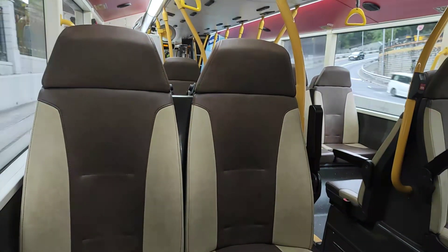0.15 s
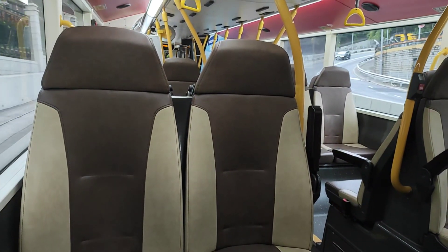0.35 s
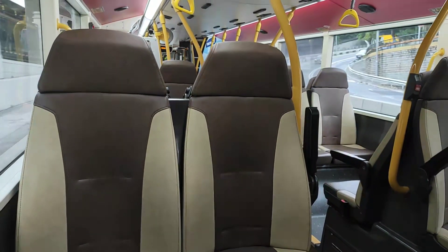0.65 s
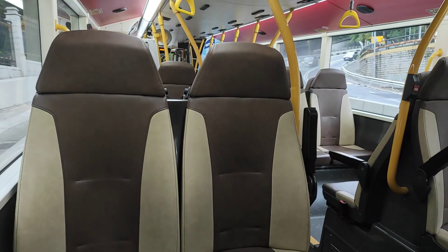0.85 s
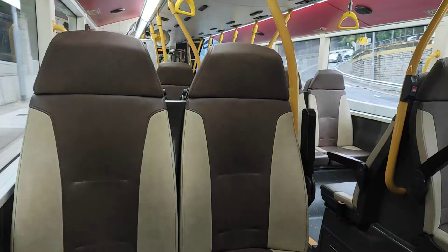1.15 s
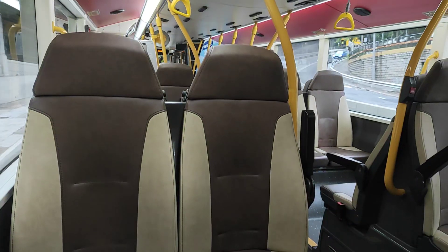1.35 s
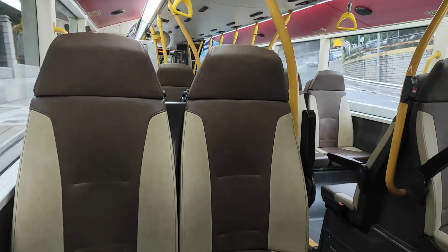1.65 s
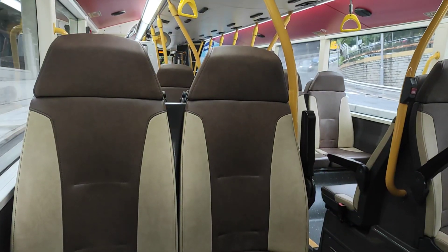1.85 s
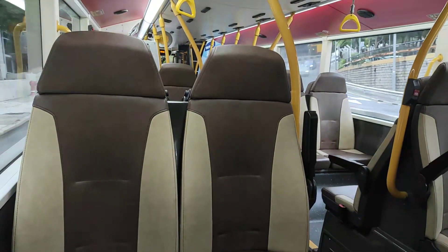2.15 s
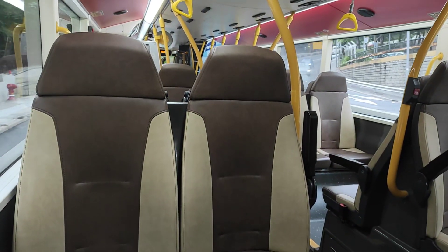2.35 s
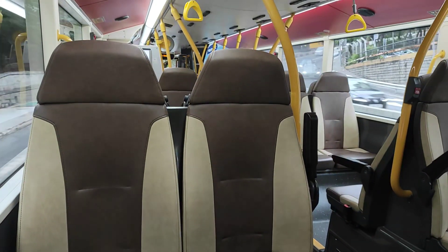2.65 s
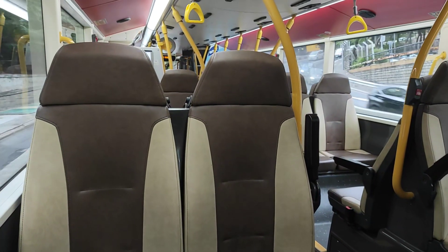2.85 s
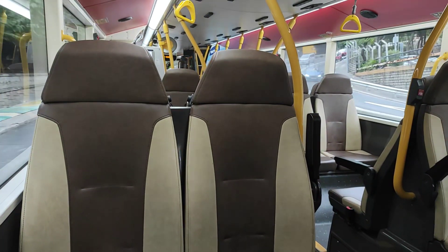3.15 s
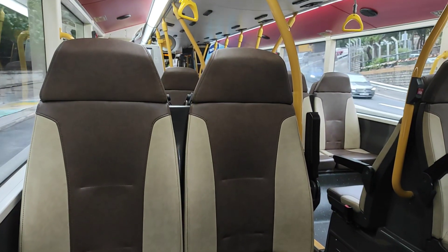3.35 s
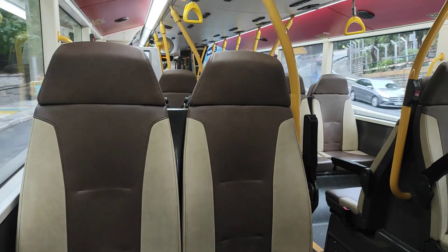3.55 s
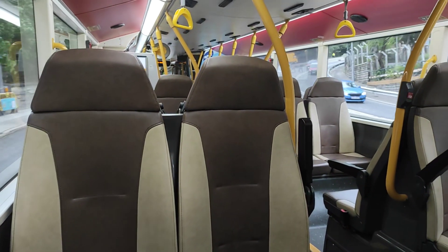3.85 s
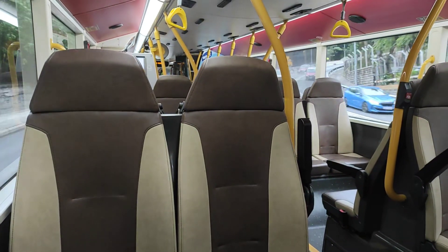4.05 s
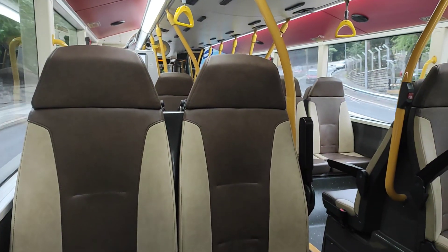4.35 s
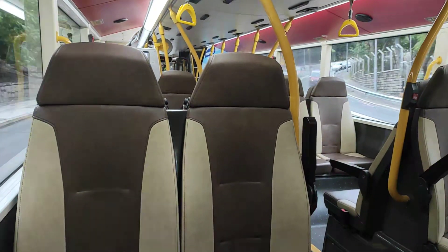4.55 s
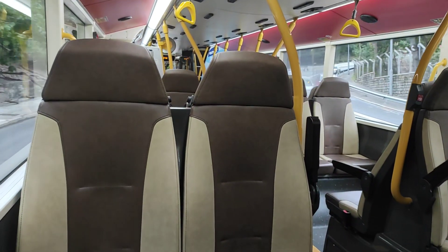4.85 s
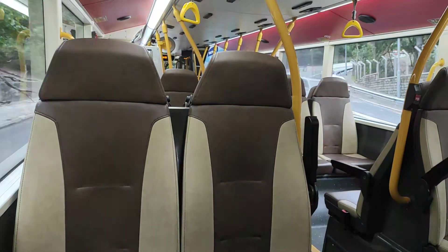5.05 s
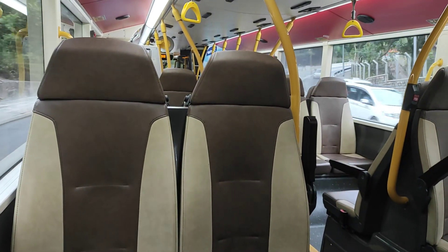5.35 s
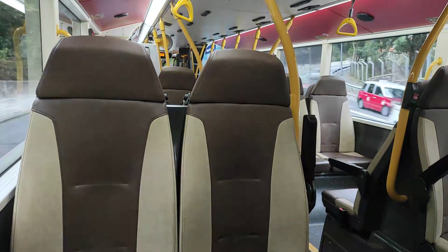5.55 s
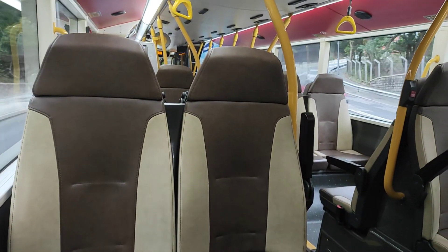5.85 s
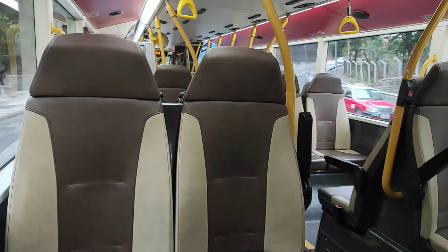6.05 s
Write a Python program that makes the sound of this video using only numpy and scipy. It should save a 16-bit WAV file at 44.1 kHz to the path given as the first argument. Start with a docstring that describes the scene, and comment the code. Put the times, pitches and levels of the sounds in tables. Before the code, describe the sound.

Inside a moving bus, a deep engine hum rises gently and drops at a gear change, over tyre roar, bumps and light rattles.

```python
"""Upper deck of a diesel bus climbing a slope. From the start the six-cylinder engine throbs over the
road's rumble and roar, with a moaning fan, faint gear whine and sizzling trim. Just after 1 s the window
frames rattle; near 2 s the first bump thuds through the body. The engine slowly gains speed, sweeping its
orders through the cabin's booms as the turbo whistle climbs. Near 5 s it changes up: the fittings chatter,
the pitch drops, the whine dies away and the whistle flares as the new gear takes the load."""
import sys
import numpy as np
from scipy import signal
from scipy.fft import rfft, irfft, next_fast_len
from scipy.io import wavfile
from scipy.ndimage import uniform_filter1d, minimum_filter1d, map_coordinates

SR = 44100
rng = np.random.default_rng(int(sys.argv[2]) if len(sys.argv) > 2 else 0)


def unload_audio(sound):
    """Save the sound as a 16-bit wav file, at the path given as the first command line argument."""
    columns = np.transpose(np.atleast_2d(sound))
    # keep every value between -1 and 1, then stretch to whole-number steps
    steps = np.round(np.clip(columns, -1, 1) * 32767)
    wavfile.write(sys.argv[1], SR, steps.astype(np.int16))


N = 273861
CYLINDERS = 6


def amp(db):
    """Decibels to gain."""
    return 10 ** (np.asarray(db) / 20)


def unit(x):
    """Scale to rms 1."""
    return x / np.sqrt(np.mean(x ** 2) + 1e-20)


def eq_gain(points, hz):
    """Gain of an EQ curve of (freq_hz, gain_db) points, on a log frequency axis."""
    freq_hz, gain_db = np.transpose(points)
    return amp(np.interp(np.log(hz + 1e-3), np.log(freq_hz), gain_db))


def automation(rows):
    """One per-sample curve for each column after the time."""
    time_s, *columns = np.transpose(rows)
    return [np.interp(np.arange(N) / SR, time_s, column) for column in columns]


def wobble(rate):
    """Smooth random modulation, rate knots a second."""
    coarse = np.arange(0, N + 16, 16)
    knots = rng.standard_normal(int(N * rate / SR) + 4)
    return np.interp(np.arange(N), coarse, map_coordinates(knots, [coarse * rate / SR], mode="nearest"))


def angle(hz):
    """Running phase of a gliding pitch."""
    return 2 * np.pi * np.cumsum(hz) / SR


def filtered(x, response):
    """Shape x with a frequency response."""
    size = next_fast_len(N + SR // 2)
    return irfft(rfft(x, size) * response(np.fft.rfftfreq(size, 1 / SR)), size)[..., :N]


def resonance(modes, hz):
    """Gain of a set of resonances at a frequency."""
    powers = (amp(db) ** 2 / (1 + (2 * (hz - centre) / width) ** 2) for centre, width, db in modes)
    return np.sqrt(sum(powers))


def patchy(x, depth_db):
    """Make the colour of a noise flicker in brief narrow patches."""
    spectrum = signal.stft(x, nperseg=1024)[2]
    patches = uniform_filter1d(rng.standard_normal(spectrum.shape[1:]), size=3, axis=0)
    patches = unit(uniform_filter1d(patches, size=6, axis=1))
    return unit(signal.istft(spectrum * amp(depth_db * patches), nperseg=1024)[1][:, :N])


def taps(per_s, scatter_db):
    """Tiny contacts of uneven strength at random moments, for each ear."""
    hit = rng.random((2, N)) < per_s / SR
    return hit * np.sign(rng.standard_normal((2, N))) * amp(scatter_db * rng.standard_normal((2, N)))


def bursts(rows):
    """Envelope of (start_s, peak_db, attack_s) hits: quick swell, slower tail."""
    ages = [(np.maximum(np.arange(N) / SR - start_s, 0) / attack_s, db) for start_s, db, attack_s in rows]
    return sum(amp(db) * age * np.exp(1 - age) for age, db in ages)


# balance at the seat: freq_hz, left_minus_right_db
PAN = [(150, .5), (170, .8), (186, -1.5), (205, 1.5), (235, 3.5), (460, 3), (490, 0), (560, 1), (588, -5),
       (622, 7), (660, 3), (1000, 1.4), (2000, 0)]

def window_side(ears):
    """The low mids are louder on the window side."""
    return filtered(ears, lambda hz: eq_gain(PAN, hz) ** np.array([[.5], [-.5]]))


# stereo width of the cabin: freq_hz, side_minus_mid_db
WIDTH = [(30, -27), (70, -20), (130, -10), (185, -8), (205, -3), (260, -5), (310, -8), (365, -9),
         (410, -5.5), (450, -7.5), (495, -6.5), (530, -4), (700, -2.5), (1000, 0)]

def cabin(pair):
    """Spread two unrelated signals through the cabin: bass centred, treble diffuse, level normalised."""
    mid, side = pair[0], filtered(pair[1], lambda hz: eq_gain(WIDTH, hz))
    ears = window_side(np.array([mid + side, mid - side]))
    return ears / np.std(ears.mean(axis=0))


def noise_bed(eq):
    """Coloured noise filling the cabin."""
    return cabin(filtered(rng.standard_normal((2, N)), lambda hz: eq_gain(eq, hz)))


def judder(cycle_hz, crank_db=0.5, firing_db=-0.9, slip_rad=0.6):
    """Tremolo of loose parts, nudged once a crank turn and once a firing."""
    cycle = angle(cycle_hz)
    crank = 2 * cycle + slip_rad * wobble(6)
    return amp(crank_db * np.sin(crank) + firing_db * np.sin(CYLINDERS * cycle))


# colour of the body's rumble: freq_hz, relative_db
RUMBLE_EQ = [(3, -30), (8, -10), (11.5, 3.5), (18, 3), (33, -1), (48, -8.5), (70, -12.5), (110, -25),
             (250, -96)]
# how hard the body shakes: time_s, fader_db
RUMBLE_FADER = [(0, -21), (.8, -19.5), (1.8, -19), (4.2, -18), (5.1, -17.5), (5.6, -20.5), (5.85, -19),
                (6.21, -20)]

def body_rumble(gain_db=0.5):
    """The road shakes the body into a deep rumble."""
    fader_db, = automation(RUMBLE_FADER)
    return amp(fader_db + gain_db) * noise_bed(RUMBLE_EQ)


# dark roar under the floor: freq_hz, relative_db
ROAR_EQ = [(40, -17), (80, 1.5), (150, 5.5), (185, 3.5), (215, -1), (330, -2.5), (470, -5.5), (610, -10),
           (690, -14), (1200, -12.5), (1450, -24.5), (2500, -59), (5000, -85)]

def tyre_roar(rough_db, level_db=-26, follow=0.63, flutter_db=1.35):
    """The tyres roar through the floor, more on rough ground."""
    return amp(level_db + follow * rough_db + flutter_db * wobble(22.01)) * noise_bed(ROAR_EQ)


# bright hiss at the windows: freq_hz, relative_db
HISS_EQ = [(500, -25), (1300, 1), (2000, 3), (3100, 1.5), (3600, -4.5), (4300, -6), (5500, -11),
           (7000, -3.5), (9900, -11.5), (11000, -47), (11600, -32.5), (15000, -28.5)]

def tyre_hiss(rough_db, gain_db=-37, follow=0.61, patchy_db=3.5):
    """The tyres hiss through the windows, more on rough ground."""
    return amp(gain_db + follow * rough_db) * np.sqrt(2) * patchy(noise_bed(HISS_EQ), patchy_db)


# bumps in the road: start_s, peak_db, attack_s
BUMPS = [(1.82, -15, .06), (3.22, -19, 0.037), (4.26, -21, .04), (4.849, -16, 0.033), (5.97, -14.5, .05)]

def thuds(body_hz=31.8):
    """Each bump swings the whole body on its lowest note for a few cycles."""
    t = np.arange(N) / SR
    return sum(bursts([bump]) * np.sin(2 * np.pi * body_hz * (t - bump[0])) for bump in BUMPS)


# notes of handrails and brackets: pitch_hz, width_hz, gain_db
RAIL_NOTES = [(2530, 150, -55), (2680, 140, -50.5), (2960, 150, -56)]

def rail_tinkle(rough_db, follow=0.73, wander_db=2.2):
    """Handrails and brackets tinkle, each on its own note, each drifting in and out."""
    notes = np.zeros((2, N))
    for pitch_hz, width_hz, db in RAIL_NOTES:
        gain = amp(db + wander_db * wobble(12))
        contacts = taps(per_s=300, scatter_db=3)
        notes += gain * unit(filtered(contacts, lambda hz: 1 / (1 + 2j * (hz - pitch_hz) / width_hz) ** 2))
    return amp(follow * rough_db) * notes


# window frame resonances: centre_hz, width_hz, relative_db
FRAME_MODES = [(1450, 350, -3), (1950, 800, -.5), (2665, 110, -1), (3000, 600, -2)]
# short rattles of the frames: start_s, accent_db, attack_s
RATTLES = [(0.045, -40, .015), (0.155, -38.5, .015), (1.115, -35.5, .012), (1.165, -38, .01),
           (1.225, -37.5, .012), (1.375, -35.5, .02), (2.9, -41, .015), (4.385, -38, .014),
           (5.315, -37.5, .014), (5.765, -39, .012)]

def window_frames(rough_db, buzz_db=-45.5, follow=0.81, rattle_db=-0.5, lowpass_hz=7000):
    """The frames buzz in small taps over rough road and now and then break into a crisp rattle."""
    ring = lambda hz: resonance(FRAME_MODES, hz)
    buzz = unit(filtered(taps(per_s=1200, scatter_db=2), lambda hz: ring(hz) ** 2))
    tick_eq = lambda hz: ring(hz) ** 1.25 / (1 + (hz / lowpass_hz) ** 6)
    ticks = unit(filtered(taps(per_s=330, scatter_db=2), tick_eq))
    return amp(buzz_db + follow * rough_db) * buzz + amp(rattle_db) * bursts(RATTLES) * ticks


# colour of the high sizzle as heard at each ear: freq_hz, relative_db
LEFT_SIZZLE_EQ = [(3000, -47), (5400, -11), (6600, -22), (7500, -12), (8500, -2), (9400, -12), (9900, -9.5),
                  (10120, -24), (11500, -50)]
RIGHT_SIZZLE_EQ = [(3000, -25.5), (5400, -10), (6400, -11), (7400, 3), (7800, -0.5), (8300, -10),
                   (9400, -13), (9900, -37), (10120, -26), (11500, -45)]

def trim_sizzle(rough_db, level_db=-34, follow=0.74, flutter_db=1.27, grain_db=0.5, patchy_db=3):
    """Loose trim sizzles in fine uneven grains, more on rough ground."""
    gain = amp(level_db + follow * rough_db + flutter_db * wobble(55))
    grains = patchy(rng.standard_normal((2, N)), patchy_db) * amp(grain_db * wobble(500))
    stereo_eq = lambda hz: np.array([eq_gain(LEFT_SIZZLE_EQ, hz), eq_gain(RIGHT_SIZZLE_EQ, hz)])
    return gain * unit(filtered(grains, stereo_eq))


# jolts to the fittings: start_s, accent_db, attack_s
JOLTS = [(.11, -26, .012), (1.065, -24, .014), (1.14, -26, .012), (1.735, -28, .018), (2.69, -27.5, .018),
         (4.21, -26, .016), (4.255, -26, .012), (4.73, -28, .022), (4.966, -20, .016)]
# colour of their chatter: freq_hz, relative_db
CHATTER_EQ = [(1500, -22), (4000, -14), (6000, -6), (7600, 0), (9000, -2), (10200, -22), (12000, -35),
              (15000, -38)]

def jolt_chatter(gain_db=-6, grain_db=1.8):
    """Each jolt shakes a brief, broad splash of chatter from the fittings."""
    grains = rng.standard_normal((2, N)) * amp(grain_db * wobble(400))
    return amp(gain_db) * bursts(JOLTS) * unit(filtered(grains, lambda hz: eq_gain(CHATTER_EQ, hz)))


# upper gear tones: order_per_cycle, relative_db
GEAR_TONES = [(288.4, -1), (300.6, -5), (350.7, -3), (400.8, 0), (450.9, 0)]
# strength of the whine: time_s, main_fader_db, upper_fader_db
WHINE_FADERS = [(0, -46.5, -58), (.35, -46.5, -56), (.7, -49, -54), (1.2, -50, -54), (1.8, -50.5, -54),
                (2.6, -52, -58), (3.4, -53, -57), (4.2, -52, -53.5), (4.8, -52.5, -55), (5.3, -55, -60),
                (5.8, -68, -72)]

def gear_whine(cycle_hz, main_order=250.5, waver_db=2.5):
    """The timing gears whine in thin broken tones that waver at each ear and die at the gear change."""
    cycle = angle(cycle_hz)
    main_db, upper_db = automation(WHINE_FADERS)

    def tone(order):
        return amp(waver_db * wobble(14)) * np.sin(order * cycle + .5 * wobble(45) + 1.3 * wobble(10))

    ears = np.zeros((2, N))
    for ear in ears:
        ear += amp(main_db) * tone(main_order)
        ear += sum(amp(upper_db + db) * tone(order) for order, db in GEAR_TONES)
    return np.sqrt(2) * ears


# glide of the fan's blade tone: time_s, pitch_hz
FAN_PITCH = [(0, 475.4), (1.1, 490.7), (4.7, 518.8), (5.55, 483), (6.21, 482)]
# fan shroud resonance: centre_hz, width_hz, peak_db
SHROUD = [(483, 21, -38)]

def cooling_fan(waver_db=2, slip_rad=0.25):
    """The fan moans, loudest where its blade tone meets the resonance of its shroud."""
    blade_hz, = automation(FAN_PITCH)
    tone = lambda: amp(waver_db * wobble(7.4)) * np.sin(angle(blade_hz) + slip_rad * wobble(9))
    return resonance(SHROUD, blade_hz) * cabin(np.array([tone(), tone()]))


# glide of the turbocharger's blade tone: time_s, pitch_hz
TURBO_PITCH = [(0, 8950), (.3, 9100), (.75, 9540), (1.05, 9760), (1.85, 9990), (2.54, 10721), (3, 11015),
               (4.3, 11105), (4.8, 11055), (5.2, 10310), (5.5, 9920), (5.62, 9830), (5.8, 9660),
               (6.21, 9700)]
# intake duct resonance: centre_hz, width_hz, relative_db
INTAKE = [(9490, 280, -34)]

def turbo_whistle(gain_db=-4, direct_db=-45, jitter_hz=12, blur=0.68, pan_db=2,
                  surge_s=5.54, surge_width_s=0.088, surge_db=-31):
    """The compressor's blade tone, blurred by turbulent air, rings the intake and flares as load returns."""
    blade_hz, = automation(TURBO_PITCH)
    surge = amp(surge_db) * np.exp(-((np.arange(N) / SR - surge_s) / surge_width_s) ** 2)
    swell = np.hypot(amp(direct_db), resonance(INTAKE, blade_hz)) + surge
    phase = angle(blade_hz + jitter_hz * wobble(60))
    ear = lambda: unit((1 + blur * wobble(130)) * np.sin(phase + blur * wobble(130) + wobble(13)))
    return amp(gain_db) * swell * np.array([amp(pan_db) * ear(), amp(-pan_db) * ear()])


# engine orders that sing on a panel: order_per_cycle, panel_hz, width_hz, peak_db
SINGING_ORDERS = [(18, 222, 30, -41), (19, 240, 24, -43), (20, 248, 24, -42), (23, 304, 20, -40),
                  (24, 302, 12, -38), (26, 348, 12, -35.5), (30, 364, 9, -40), (36, 350, 12, -35),
                  (45, 586, 24, -38.5), (51, 623, 14, -43)]

def panel_moan(cycle_hz, waver_db=1.55, slip_rad=0.3):
    """Single high orders sing out as each passes through a panel resonance."""
    cycle, voice = angle(cycle_hz), np.zeros(N)
    for order, *panel in SINGING_ORDERS:
        gain = resonance([panel], order * cycle_hz) * amp(waver_db * wobble(6.5))
        voice += gain * np.sin(order * cycle + rng.uniform(0, 2 * np.pi) + slip_rad * wobble(10))
    return np.sqrt(2) * window_side(np.array([voice, voice]))


# body panel resonances: centre_hz, width_hz, relative_db
PANELS = [(249, 60, -3), (302, 21, -1.5), (349, 19, 1.5), (380, 40, -3), (454, 41, -4), (510, 40, -6),
          (591, 31, -6), (827, 125, -11), (1155, 170, -12.5)]

def engine_growl(cycle_hz, level_db=-32.5, rough_rad=0.36, waver_db=3, weak_db=-7):
    """Higher orders, roughened by uneven combustion, ring the body panels."""
    cycle, pair = angle(cycle_hz), np.zeros((2, N))
    for order in np.arange(17, 97):
        phase = order * cycle + rng.uniform(0, 2 * np.pi, (2, 1)) + rough_rad * wobble(10)
        weakness = 0 if order % 3 == 0 else .5 if order % 2 == 0 else 1
        pair += amp(weakness * weak_db + waver_db * wobble(2.06)) * np.sin(phase)
    return amp(level_db) * cabin(filtered(pair, lambda hz: resonance(PANELS, hz)))


# orders around the firing tones: order_per_cycle, relative_db
DRONE_ORDERS = [(4, -30), (7, -28), (8, -29.5), (9, -24.5), (10, -28.5), (11, -30.5), (13, -31),
                (14, -25.5), (15, -28.5), (16, -36)]
# booms of the cabin air: centre_hz, width_hz, gain_db
BOOMS = [(53.8, 4, -1.5), (74.6, 6.3, -14), (121.8, 15.6, -0.5), (152.8, 7.4, 1), (185.9, 8.4, -1)]

def engine_drone(cycle_hz, waver_db=1.1, slip_rad=0.13, direct_db=-24, ear_rad=-0.06, db_per_octave=7):
    """Unequal cylinders add in-between orders that grow with speed and swell on the cabin's booms."""
    cycle, ears = angle(cycle_hz), np.zeros((2, N))
    for order, db in DRONE_ORDERS:
        boom = resonance(BOOMS, order * cycle_hz) + amp(direct_db)
        phase = order * cycle + rng.uniform(0, 2 * np.pi) + slip_rad * wobble(7)
        ears += amp(db + waver_db * wobble(7)) * boom * np.sin([phase + ear_rad, phase - ear_rad])
    speed_gain = amp(db_per_octave * np.log2(cycle_hz / cycle_hz[0]))
    return np.sqrt(2) * speed_gain * window_side(ears)


# weight of the engine note: time_s, firing_tone_db, octave_db
THROB_FADERS = [(0, -18, -25), (.55, -16, -25.5), (.9, -18.5, -29), (1.15, -23, -31), (1.45, -20, -31),
                (1.7, -22.5, -33), (2.35, -18, -33), (2.72, -21.5, -23.5), (2.95, -28.5, -21.5),
                (3.5, -30, -20.3), (3.8, -24.5, -23), (4.3, -24, -23), (4.82, -30, -23.5), (5, -24, -21.5),
                (5.25, -18.5, -23), (5.42, -28, -23), (5.55, -24, -23), (6.21, -24.5, -23.5)]

def engine_throb(cycle_hz, ear_rad=-0.03):
    """The clean firing tone sits dead centre; its octave, slightly spread, swells under load."""
    phase = CYLINDERS * angle(cycle_hz)
    firing_db, octave_db = automation(THROB_FADERS)
    octave = amp(octave_db) * np.sin([2 * phase + ear_rad, 2 * phase - ear_rad])
    return np.sqrt(2) * (amp(firing_db) * np.sin(phase) + octave)


# engine speed through the climb and gear change: time_s, firing_hz
REVS = [(0, 72.65), (.45, 72.75), (.75, 73.15), (1.1, 73.3), (1.5, 73.8), (2, 75), (2.5, 75.7), (3, 77.6),
        (3.9, 80.3), (4.4, 80.5), (4.82, 81.4), (5, 77.6), (5.3, 68.8), (5.45, 62), (5.62, 58.7),
        (6.21, 58.1)]
# road roughness, which drives the tyres and loose fittings: time_s, relative_db
ROUGHNESS = [(0, 1), (.22, -2), (.5, -3.5), (.9, -3), (1.15, 1.3), (1.7, 1.2), (2.45, -1), (2.8, 1),
             (3.4, -0.5), (4, 0.5), (4.3, 2), (4.6, 1.4), (5.4, 1.7), (5.65, -2.5), (6.21, -1.5)]

def scene():
    """The mix at the seat: engine in front, over whining machinery, road and loose fittings."""
    firing_hz, = automation(REVS)
    cycle_hz = firing_hz / CYLINDERS  # four-stroke cycle rate; orders are its multiples
    rough_db, = automation(ROUGHNESS)
    tremolo = judder(cycle_hz)
    engine = engine_throb(cycle_hz) + engine_drone(cycle_hz) + engine_growl(cycle_hz) + panel_moan(cycle_hz)
    fittings = tremolo * (trim_sizzle(rough_db) + window_frames(rough_db) + rail_tinkle(rough_db))
    fittings += jolt_chatter()
    machinery = gear_whine(cycle_hz) + cooling_fan() + turbo_whistle()
    road = body_rumble() + tyre_roar(rough_db) + tremolo * tyre_hiss(rough_db) + thuds()
    return road + fittings + machinery + engine


def record(dry, ceiling=0.66, top_hz=15700):
    """A limiter holds down the highest peaks, then a brick-wall low-pass cuts the very top."""
    needed = np.minimum(1, ceiling / (np.abs(dry).max(axis=0) + 1e-9))
    gain = uniform_filter1d(minimum_filter1d(needed, size=700), size=700)
    return filtered(dry * gain, lambda hz: hz < top_hz)


dry = scene()
out = record(dry)
unload_audio(out)
```